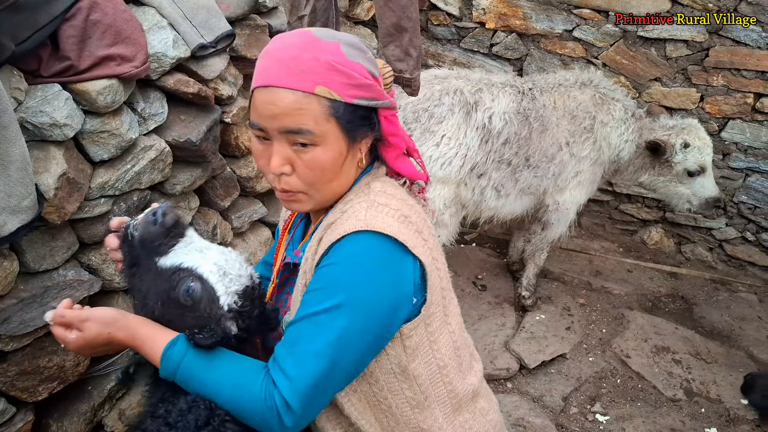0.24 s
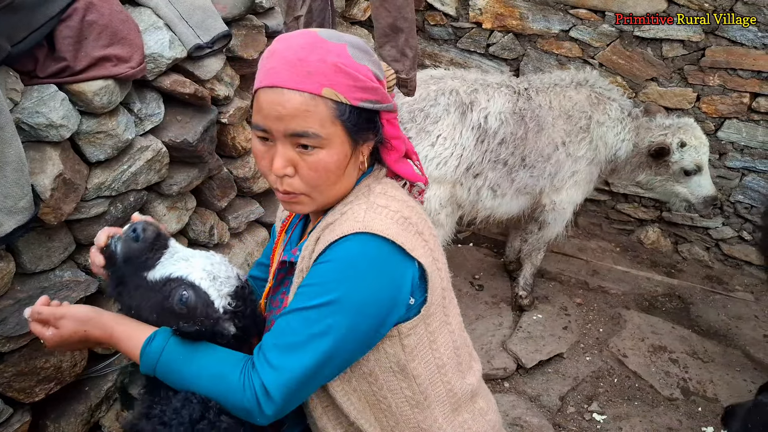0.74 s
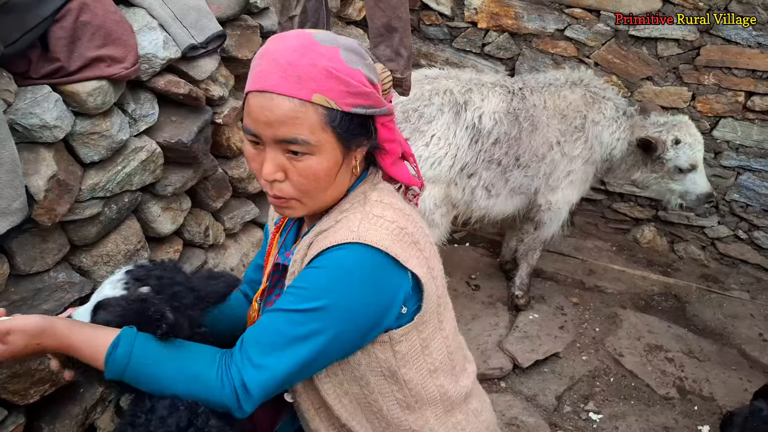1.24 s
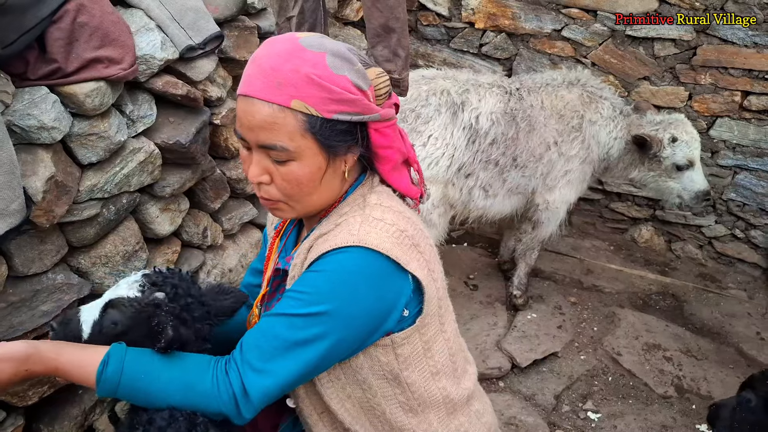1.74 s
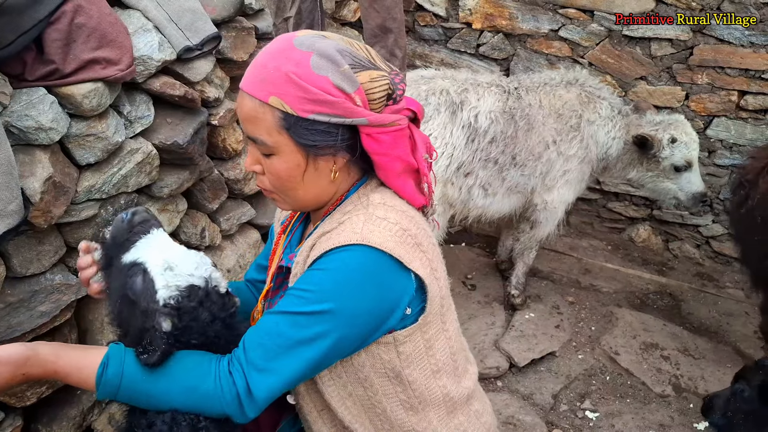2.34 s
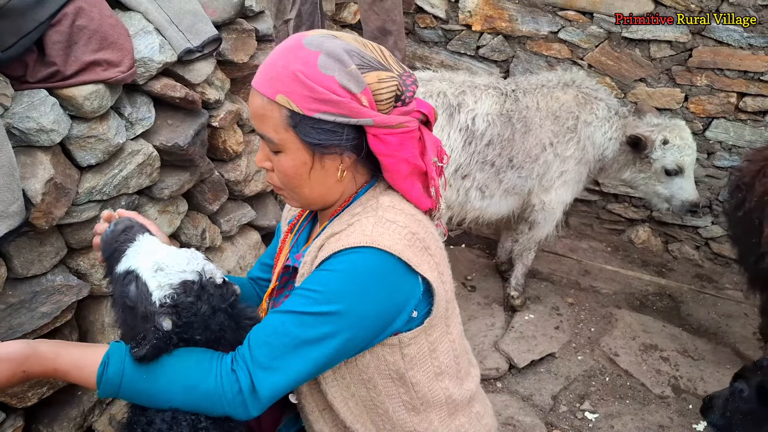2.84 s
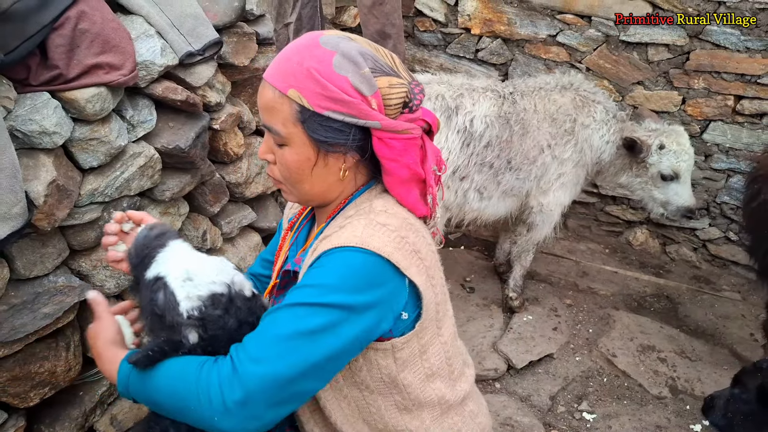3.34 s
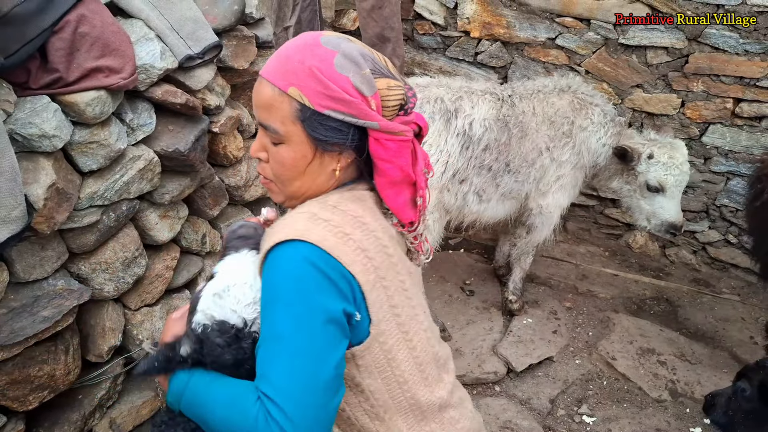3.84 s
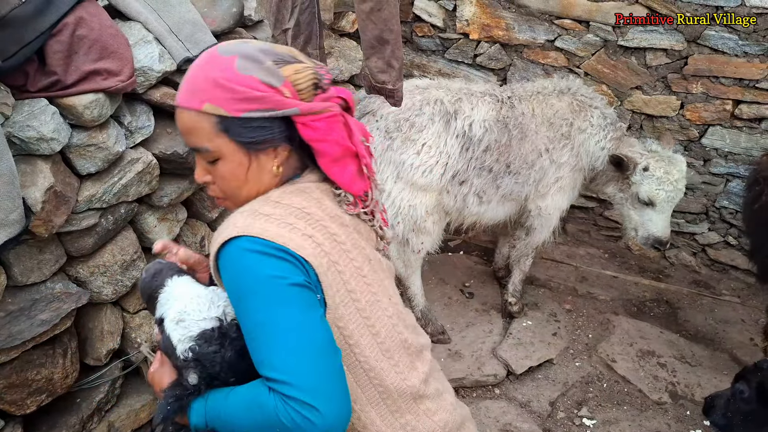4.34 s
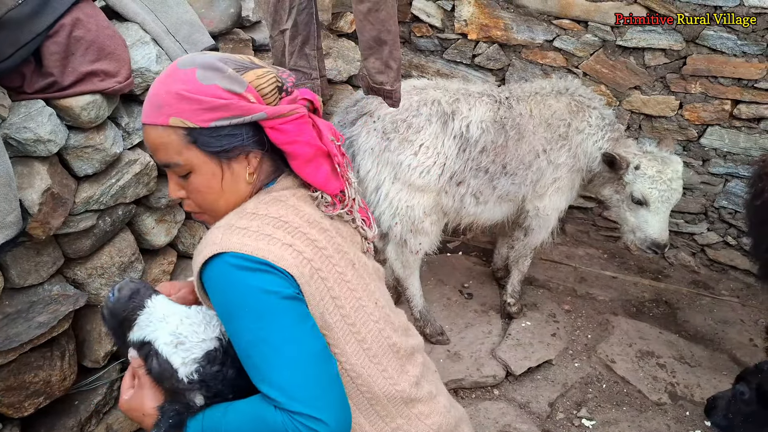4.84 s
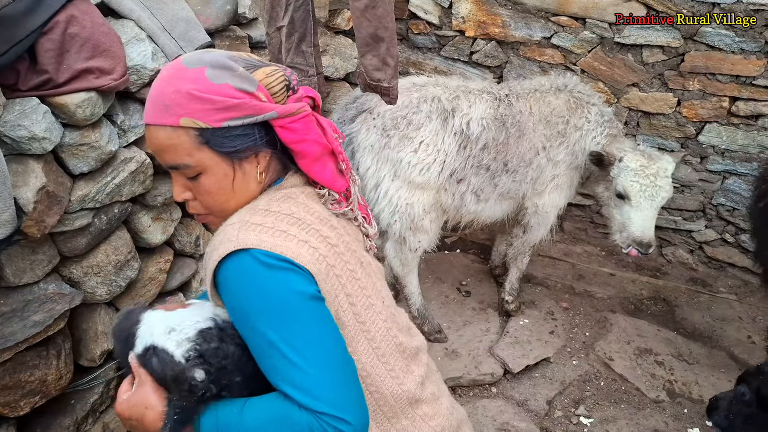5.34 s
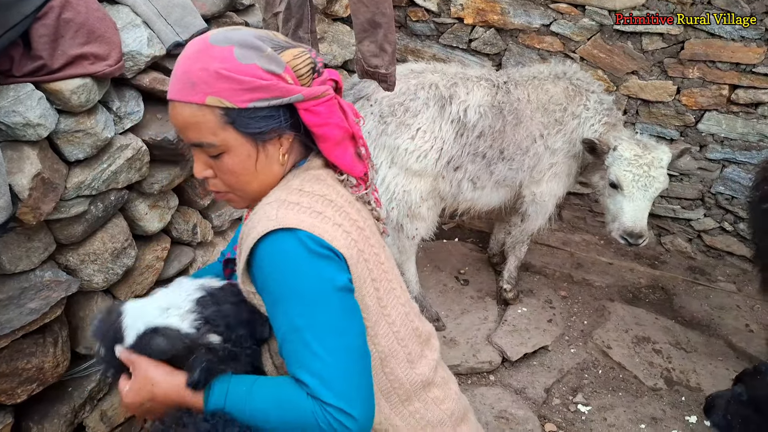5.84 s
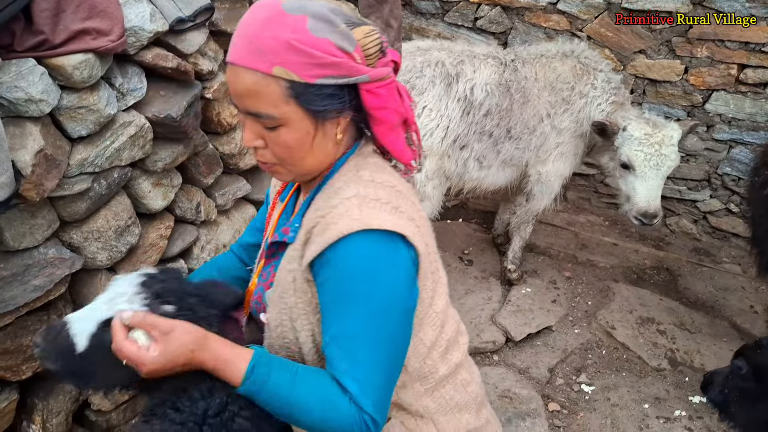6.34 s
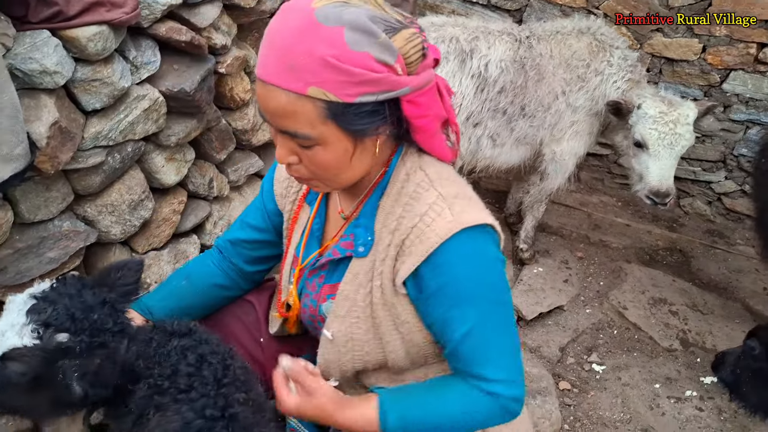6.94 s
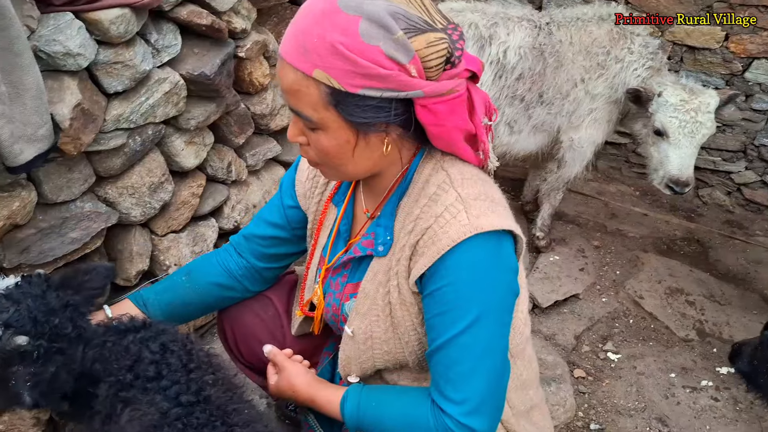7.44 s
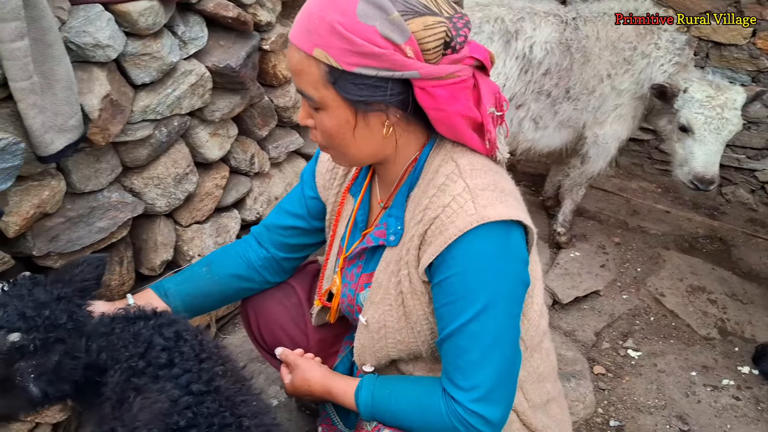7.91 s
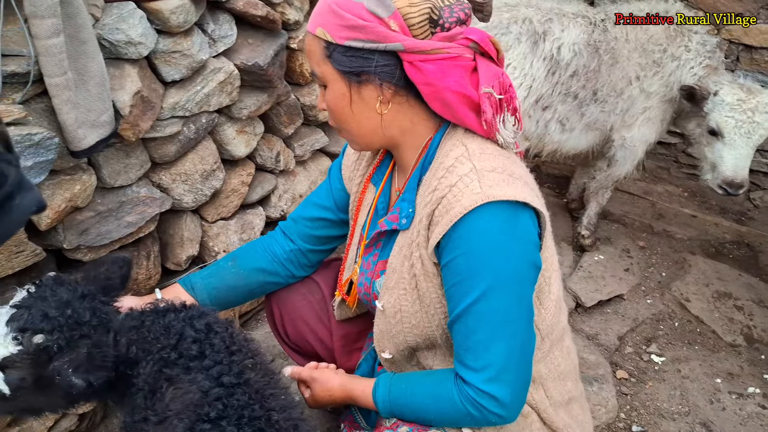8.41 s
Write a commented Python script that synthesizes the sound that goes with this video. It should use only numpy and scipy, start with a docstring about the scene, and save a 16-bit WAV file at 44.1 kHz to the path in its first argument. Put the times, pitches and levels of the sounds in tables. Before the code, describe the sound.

A calf gives three short, low grunts close by, over soft cloth rustling and a steady distant roar.

```python
"""A calf grunts three times, close by in a stone pen: slow throat pulses ring its chest and nose,
then breath takes over. The walls answer briefly. Wool and cloth rustle and tick, something scrapes
on stone, and a far roar, as of a stream, fills the pen. A phone's two microphone ports differ in
colour; the right one lags by up to about 0.5 ms."""
import sys
import numpy as np
from scipy import signal
from scipy.fft import rfft, irfft, next_fast_len
from scipy.io import wavfile
from scipy.ndimage import uniform_filter1d, map_coordinates

SR = 44100
rng = np.random.default_rng(int(sys.argv[2]) if len(sys.argv) > 2 else 0)


def transcribe(u):
    """Save the signal u as a 16-bit wav file named by the first command-line argument.

    u: samples, shape (n,) or (channels, n), limited to [-1, 1]; the rate is SR.
    q: integer samples, one column per channel.
    """
    v = np.clip(np.atleast_2d(u).T, -1, 1)
    q = np.round(v * 32767).astype(np.int16)
    wavfile.write(sys.argv[1], SR, q)


N = 382347

# grunts: (breath peak [s], breath [dB], nose start [Hz], nose end [Hz], mouth re nose [dB])
CALF_GRUNTS = [(2.262, -31.5, 2060, 1760, -23.5), (3.796, -28, 2055, 2040, -19.5),
               (8.149, -30, 1985, 1980, -33)]
# vocal folds, one table per grunt: (time [s], pulse rate [Hz])
FOLD_RATES = [
    [(2.148, 40), (2.198, 42), (2.243, 51), (2.27, 37), (2.36, 33)],
    [(3.687, 42.5), (3.711, 42), (3.755, 54), (3.78, 50), (3.89, 51)],
    [(8.043, 41.5), (8.067, 41.5), (8.091, 48.5), (8.165, 59), (8.195, 44), (8.27, 40)],
]
# mouth resonances: (centre [Hz], width [Hz], level [dB])
MOUTH_MODES = [(3480, 150, 11), (4410, 76, -1), (5165, 45, -2), (7100, 250, -4)]
BREATH_ROUND_S = 0.018  # half-width of the rounded breath peak


def calf_voice():
    """Slow vocal fold pulses ring chest, throat, nose and mouth. Returns voice and puff envelope."""
    # pulse strength, one table per grunt: (time [s], chest [dB], nose [dB])
    efforts = [
        [(2.148, -26, -48), (2.198, -7, -29), (2.222, -6, -17), (2.245, -13.5, -22), (2.27, -19, -24),
         (2.29, -21, -20), (2.316, -10.5, -14), (2.36, -38, -54)],
        [(3.687, -20, -38), (3.711, -8, -36), (3.734, -4.5, -17), (3.755, -10, -23), (3.775, -15, -24),
         (3.8, -23, -23), (3.865, -21, -24), (3.89, -26, -55)],
        [(8.043, -18, -50), (8.067, -4, -10.5), (8.112, -5.5, -25), (8.15, -9, -15), (8.17, -22, -29),
         (8.19, -15, -29), (8.235, -22, -33), (8.27, -25, -51)],
    ]
    # chest resonances: (centre [Hz], width [Hz], level [dB])
    chest_modes = [(96.4, 26, 0), (145, 36, -18.5), (188, 23, -20), (296, 67, -18)]
    # throat resonances: (centre [Hz], width [Hz], level [dB])
    throat_modes = [(440, 130, 11), (586, 110, -10), (805, 56, 2.5), (1170, 100, -4), (1300, 820, 8)]
    # nose resonances: (multiple of nose_hz, width [Hz], level [dB])
    nose_modes = [(1, 113, 7), (1.065, 110, -1), (.9, 180, 5), (2, 2500, -6)]
    sag_db, fall_t60_s, return_t60_s = -5, .025, .007
    throat_db, throat_db_per_chest_db, head_attack_s = -12.5, 1.3, .0016
    chest, head, puffs = np.zeros((3, N + SR))
    t = np.arange(SR // 100) / SR
    for folds, effort, (peak_s, _, start_hz, end_hz, mouth_db) in zip(FOLD_RATES, efforts, CALF_GRUNTS):
        effort_s, *effort_db = np.transpose(effort)
        at_s, end_s = folds[0][0], folds[-1][0]
        while at_s < end_s:
            i = round(at_s * SR)
            rate_hz = np.interp(at_s, *np.transpose(folds))
            chest_db, nose_db = (np.interp(at_s, effort_s, column) for column in effort_db)
            nose_hz = np.interp(at_s - peak_s, [-BREATH_ROUND_S, BREATH_ROUND_S], [start_hz, end_hz])
            sink = np.interp(at_s, [peak_s, end_s], [1, 0.67])  # chest pitch drops as air runs out
            thump = ring(chest_modes, scatter_db=1, attack_s=0.00015, tune=sink)
            chest[i:i + len(thump)] += amp(chest_db) * thump
            # pressure sags as the folds draw shut, then returns
            chest[i - len(t):i] -= amp(chest_db + sag_db - 60 * t / fall_t60_s)[::-1]
            chest[i:i + len(t)] -= amp(chest_db + sag_db - 60 * t / return_t60_s)
            nose = ring(nose_modes, scatter_db=5, attack_s=head_attack_s, tune=nose_hz)
            mouth = amp(mouth_db) * ring(MOUTH_MODES, scatter_db=7.5, attack_s=head_attack_s)
            throat = ring(throat_modes, scatter_db=3, attack_s=0.0011)
            throat *= amp(throat_db + throat_db_per_chest_db * chest_db)
            damping = amp(-30 * (np.arange(len(nose)) * rate_hz / SR) ** 2)  # the folds reopen
            head[i:i + len(nose)] += throat + amp(nose_db) * damping * (nose + mouth)
            puffs[i:i + len(t)] += np.hanning(len(t))
            at_s += 1 / rate_hz
    soft_chest = filtered(chest[:N], lambda hz: 1 / (1 + (hz / 700) ** 4))  # flesh rounds the thump
    return soft_chest + head[:N], puffs[:N]


def ring(modes, scatter_db, attack_s, tune=1):
    """One pulse through damped resonances, each varied at random in level and by 1.5 % in pitch."""
    t = np.arange(SR // 10) / SR
    rings = 0
    for hz, width_hz, db in modes:
        decay = amp(db + scatter_db * rng.standard_normal()) * np.exp(-np.pi * width_hz * t)
        pitch_hz = hz * tune * (1 + .015 * rng.standard_normal())
        rings += decay * np.sin(2 * np.pi * pitch_hz * t)
    return rings * (1 - np.exp(-t / attack_s)) ** 2


def calf_breath(puffs):
    """Air puffs with each pulse, rushes through the muzzle and whistles in the open mouth."""
    # muzzle resonances: (centre [Hz], width [Hz], level [dB])
    muzzle_modes = [(393, 150, 16.5), (1160, 550, 2.5), (1910, 393, 4.5), (3730, 440, -19),
                    (4740, 110, -20), (7300, 430, -8.5), (7700, 970, -16), (14800, 2200, -19.5)]
    rise_db_per_s, fall_db_per_s, whistle_db = 125, 202, -3
    t = np.arange(N) / SR
    flow, whistle = 0, 0
    for folds, (peak_s, breath_db, _, _, mouth_db) in zip(FOLD_RATES, CALF_GRUNTS):
        from_peak_s = np.hypot(t - peak_s, BREATH_ROUND_S) - BREATH_ROUND_S
        voiced = (t > folds[0][0]) & (t < folds[-1][0])
        swell = voiced * amp(breath_db - from_peak_s * np.where(t < peak_s, rise_db_per_s, fall_db_per_s))
        flow += swell
        whistle += amp(whistle_db + mouth_db) * swell
    air = rush([(100, 0)], [(300, 0.69), (3000, 0.34), (9000, 0.09)], patchy_db=2)
    air *= 0.84 + 0.72 * puffs
    muzzle = filtered(air, lambda f: sum((-1) ** k * amp(db) * resonance(f, hz, width)
                                         for k, (hz, width, db) in enumerate(muzzle_modes)))
    mouth = filtered(air, lambda f: sum(amp(db) / width * resonance(f, hz, width)
                                        for hz, width, db in MOUTH_MODES))
    return flow * unit(muzzle) + whistle * unit(mouth)


def walls(voice):
    """Stone walls answer with a short tail; each frequency dies at its own speed."""
    # decay: (frequency [Hz], t60 [s])
    wall_t60 = [(100, 0.16), (1000, 0.2), (8000, 0.01)]
    hz, t, noise = signal.stft(rng.standard_normal((2, SR // 4)), SR, nperseg=256)
    tail = signal.istft(noise * amp(-60 * t / along(wall_t60, hz)[:, None]), SR, nperseg=256)[1]
    tail = filtered(tail, lambda f: f / (f + 600))  # bass escapes through the loose stones
    delayed = np.pad(voice, (200, 0))[None]
    return signal.fftconvolve(delayed, tail / np.linalg.norm(tail[0]), axes=1)[:, :N]


def rustle():
    """Wool and cloth fibres rub in clumps: fine hiss and coarse swish, over fidgeting that settles."""
    # rubs: (peak [s], fine [dB], coarse [dB], rise [s], fall [s])
    rubs = [(.05, -59, -50, 0.053, 0.1), (.16, -56, -54, 0.24, 0.066), (.49, -58.5, -57, .04, .08),
            (.79, -58, -51, 0.079, 0.097), (.95, -62, -53, .08, 0.076), (1.17, -62, -56, 0.028, .1),
            (1.63, -59, -54, 0.069, .03), (1.7, -57, -51, .04, 0.061), (2.02, -62, -59, 0.072, .4),
            (2.446, -61, -51, 0.11, .1), (2.9, -61, -56, 0.067, .14), (3.27, -68, -63, .04, .1),
            (3.526, -61, -54.5, .08, .12), (3.65, -63, -54, 0.061, 0.082), (3.96, -63, -60, 0.14, 0.092),
            (4.19, -64, -57, 0.17, .1), (4.31, -58, -52.5, 0.13, 0.076), (4.5, -67, -61, .02, .08),
            (4.79, -65, -68, .01, .03), (5.1, -55, -49, 0.082, 0.064), (5.24, -63, -60, .1, .08),
            (5.41, -63, -56, 0.18, .12), (5.52, -61, -44, .006, 0.027), (6.09, -60.5, -57, .11, .25),
            (6.79, -66, -56, .1, .15), (7.32, -66, -66, .02, .04), (7.55, -56, -52.5, 0.05, .06),
            (7.607, -51, -43.5, 0.048, 0.021)]
    # hiss spectrum: (frequency [Hz], density [dB])
    fine_spectrum = [(4000, -34), (8000, 0.5), (11000, -1.5), (13500, 3.5), (17000, -11)]
    # swish spectrum: (frequency [Hz], density [dB])
    coarse_spectrum = [(1200, -3), (2500, -0.5), (4500, 0), (7000, -6), (10000, -25)]
    settle_db_per_s, swing_db = 2.4, 11  # swing: change over one rise or fall time
    t = np.arange(N) / SR
    fine, coarse = (amp(db - settle_db_per_s * t + 5 * wobble(12)) for db in (-67.5, -64.5))
    for peak_s, fine_db, coarse_db, rise_s, fall_s in rubs:
        swell = amp(-swing_db * np.abs(t - peak_s) / np.where(t < peak_s, rise_s, fall_s))
        fine = np.maximum(fine, amp(fine_db) * swell)
        coarse = np.maximum(coarse, amp(coarse_db) * swell)
    clumps = amp(2.9 * wobble(40) + 1.1 * wobble(300))
    hiss = amp(0.5) * fine * rush(fine_spectrum, [(8000, 0.051)], patchy_db=3)
    swish = coarse * rush(coarse_spectrum, [(4000, 0.066)], patchy_db=2)
    return clumps * (hiss + swish)


def ticks():
    """Dry ticks and scrapes, each a noise burst in one resonance."""
    # (time [s], peak [dB], centre [Hz], width [Hz], rise [s], t60 [s], left minus right [dB])
    bursts = [(0.744, -36, 1520, 150, .01, 0.14, 3), (0.75, -37, 1790, 300, .008, 0.11, 2),
              (0.756, -44.5, 2900, 2500, .012, 0.084, 4), (.8, -60, 7450, 1500, .001, .02, -3),
              (.885, -44, 1410, 700, .02, 0.16, 4), (1.16, -49.5, 6300, 900, .001, .035, -8),
              (1.52, -56, 8000, 3000, .002, .04, 4), (1.62, -56, 13500, 4000, .002, .04, 0),
              (2.1506, -41.5, 12900, 9000, .001, 0.028, 2), (2.433, -52, 5000, 2500, .004, .05, -2),
              (3.9924, -50, 13000, 7000, .0005, .015, 10), (4.7886, -63, 12000, 5000, .001, .02, 1),
              (5.31, -57, 14000, 600, .001, .06, 2), (5.516, -38, 1810, 250, .001, 0.083, -4),
              (7.594, -45.5, 4800, 2500, .003, 0.06, 2), (7.594, -52, 12500, 5000, .003, .05, 0)]
    out, t = np.zeros((2, N + SR)), np.arange(SR // 6) / SR
    for at_s, db, hz, width_hz, rise_s, t60_s, pan_db in bursts:
        noise = rng.standard_normal(len(t)) + 1.3 * rng.standard_normal((2, len(t)))
        band = unit(filtered(noise, lambda f: resonance(f, hz, width_hz) ** 2))
        envelope = (1 - np.exp(-t / rise_s)) * amp(-60 * t / t60_s)
        gain = amp([[db + pan_db / 2], [db - pan_db / 2]])
        i = round(at_s * SR)
        out[:, i:i + len(t)] += gain * band * envelope / envelope.max()
    return out[:, :N]


def roar():
    """A far, low roar that swells at several speeds."""
    # slow swell: (time [s], level [dB])
    levels = [(0, -33), (1.5, -34), (2, -34.5), (3.2, -34), (4.5, -36), (5.5, -33.5), (7.1, -33.5),
              (8.06, -35), (8.25, -36.5), (8.5, -36), (8.67, -36.5)]
    # (frequency [Hz], density [dB])
    spectrum = [(20, -57), (45, -7), (80, -1), (236, -1), (310, -3.5), (470, -4.5), (560, -12.5),
                (750, -17), (1100, -21.5), (1500, -26.5), (2200, -26), (3300, -33), (5500, -38),
                (9000, -47), (16000, -55.5)]
    # (frequency [Hz], left-right correlation)
    correlation = [(60, 1), (330, 0.95), (560, 0.38), (900, 0.29), (1450, 0.38), (1800, 0.33), (2800, 0.17),
                   (3700, 0.029), (15000, .04)]
    level_db = np.interp(np.arange(N) / SR, *np.transpose(levels), left=-200, right=-200)
    waver_db = 1.5 + 1.2 * wobble(2.92) + 0.27 * wobble(5.5)
    return amp(level_db + waver_db) * rush(spectrum, correlation, patchy_db=1)


def rush(spectrum, correlation, patchy_db):
    """Stereo noise, rms 1, with patches of random gain. Curves: (Hz, dB) and (Hz, correlation)."""
    bins = signal.stft(rng.standard_normal((2, N + 512)), nperseg=512)[2]
    patches = uniform_filter1d(rng.standard_normal(bins.shape[1:]), size=8, axis=0)
    patches = uniform_filter1d(patches, size=6, axis=1)
    pair = signal.istft(bins * amp(patchy_db * unit(patches)), nperseg=512)[1][:, :N]
    angle = lambda hz: np.arccos(np.clip(along(correlation, hz), -1, 1)) / 2
    split = lambda hz: [np.cos(angle(hz)), np.sin(angle(hz))]
    mid, side = filtered(pair, lambda hz: amp(along(spectrum, hz)) * split(hz))
    return unit(np.array([mid + side, mid - side]))


def resonance(hz, centre_hz, width_hz):
    """Two-pole band-pass response, peak 1."""
    return 1j * hz * width_hz / (centre_hz ** 2 - hz ** 2 + 1j * hz * width_hz)


def filtered(x, response):
    """Apply a complex response(hz)."""
    size = next_fast_len(x.shape[-1] + 8192)
    return irfft(rfft(x, size) * response(np.fft.rfftfreq(size, 1 / SR)), size)[..., :x.shape[-1]]


def wobble(rate_hz):
    """Smooth random curve."""
    knots = rng.standard_normal(int(N * rate_hz / SR) + 4)
    return map_coordinates(knots, [np.arange(N) * rate_hz / SR])


def along(points, hz):
    """Interpolate (Hz, value) points on a log axis."""
    points_hz, values = np.transpose(points)
    return np.interp(np.log(hz + 1), np.log(points_hz + 1), values)


def amp(db):
    """dB to gain."""
    return 10 ** (np.asarray(db) / 20)


def unit(x):
    """Scale to rms 1."""
    return x / np.sqrt(np.mean(x ** 2) + 1e-20)


def scene():
    """The calf, its echo off the walls, and the pen."""
    delay_s, side_db, wall_db = np.array([[.00013], [0]]), [[.6], [-.6]], -13  # pairs: left, right
    voice, puffs = calf_voice()
    breath = calf_breath(puffs)
    direct = filtered(voice, lambda hz: np.exp(-2j * np.pi * hz * delay_s) * amp(side_db))
    return direct + breath + amp(wall_db) * walls(voice) + roar() + rustle() + ticks()


def record(dry):
    """Two ports of unlike colour, the right one late; deep bass and top treble are cut."""
    # port colour: (frequency [Hz], left minus right [dB])
    port_balance = [(60, 2), (200, -0.5), (1200, 0), (2200, -5.5), (4400, -2), (7000, -1), (9500, 6),
                    (12500, 3.5), (15500, 3)]
    # right port lag: (frequency [Hz], phase [rad])
    port_lag = [(0, 0), (520, 0.65), (1120, 3), (1500, 4), (2840, 9.5), (16000, 52)]
    low_cut_hz, top_hz = 42, 15800
    colour = lambda hz: amp(along(port_balance, hz) * [[.5], [-.5]])
    lag = lambda hz: np.exp(-1j * np.interp(hz, *np.transpose(port_lag)) * [[0], [1]])
    band = lambda hz: hz ** 2 / (hz ** 2 + low_cut_hz ** 2) * (hz < top_hz)
    return filtered(dry, lambda hz: colour(hz) * lag(hz) * band(hz))


dry = scene()
out = record(dry)
transcribe(out)
```